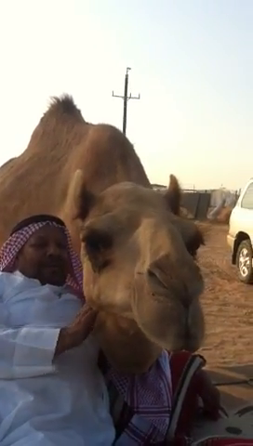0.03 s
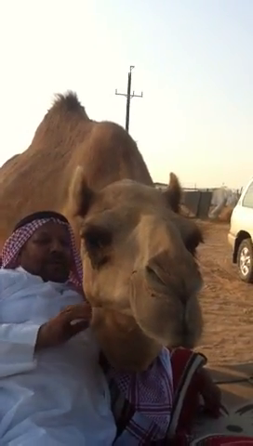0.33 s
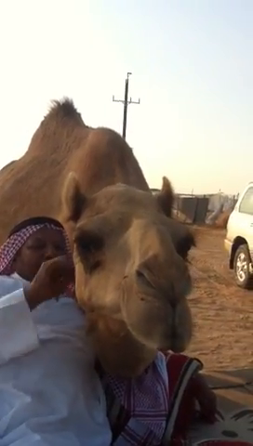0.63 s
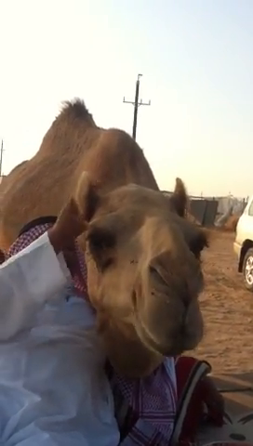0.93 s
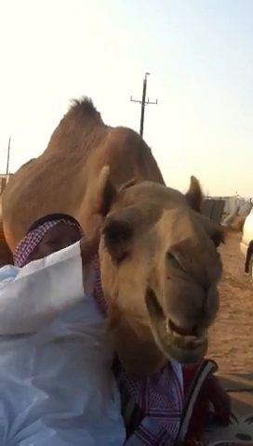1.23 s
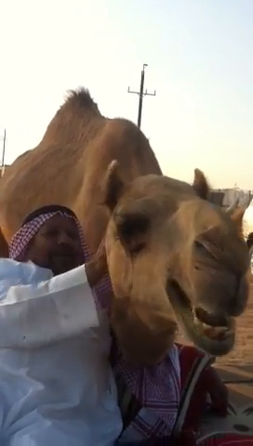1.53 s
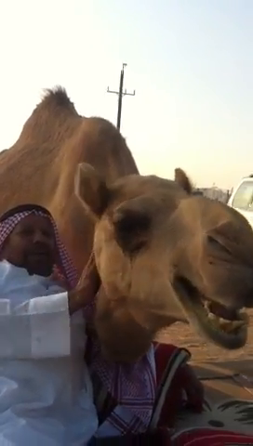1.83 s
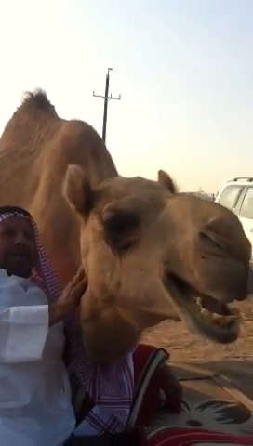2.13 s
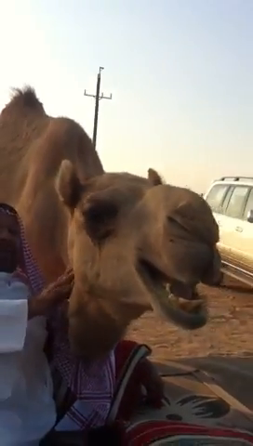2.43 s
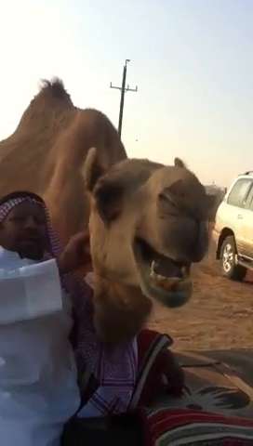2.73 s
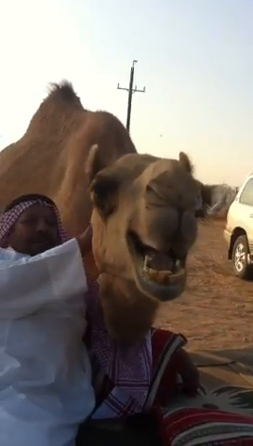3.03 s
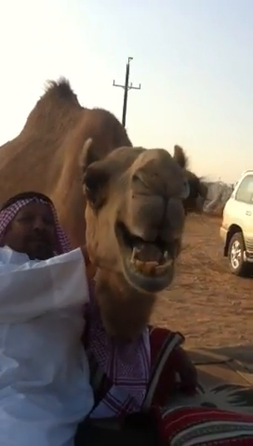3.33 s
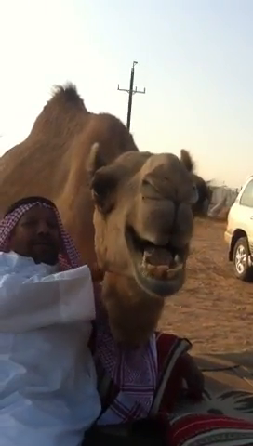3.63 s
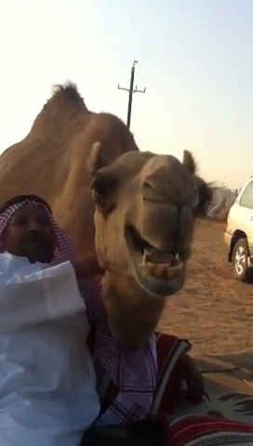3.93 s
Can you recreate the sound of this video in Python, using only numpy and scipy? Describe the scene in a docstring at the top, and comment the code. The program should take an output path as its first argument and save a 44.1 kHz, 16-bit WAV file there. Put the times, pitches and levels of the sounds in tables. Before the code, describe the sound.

A camel's low nasal moan turns into a loud, wet, rasping roar close by.

```python
"""Still desert air, a camel close to a small microphone. It moans softly through the nose, lips closed,
parts them briefly, then snorts with a catch in the throat. Its mouth opens in a long gargling roar:
slow throat pulses, accented in twos and later in threes, ring in chest, throat and mouth, with wet
slaps of loose tissue and a hiss of air. A few dull thumps sound under both moan and roar."""
import sys
import numpy as np
from scipy import signal
from scipy.fft import rfft, irfft
from scipy.io import wavfile
from scipy.ndimage import uniform_filter1d

SR = 44100
rng = np.random.default_rng(int(sys.argv[2]) if len(sys.argv) > 2 else 0)


def wrap_up_sound(samples):
    """Save the sound to the file named by the first command line argument, as 16-bit audio."""
    columns = np.atleast_2d(samples).T
    # keep every value between -1 and 1, then stretch to whole-number steps
    tamed = np.clip(columns, -1, 1)
    steps = np.round(tamed * 32767).astype(np.int16)
    wavfile.write(sys.argv[1], SR, steps)


N = 176400

# resonances of the throat: centre_hz, width_hz, gain_db
THROAT_RESONANCES = [(355, 59, -1.5), (450.6, 117, -3), (593.8, 78.4, 4), (688, 151, -16)]
# the main mouth resonance, which sinks as the jaw opens: time_s, centre_hz, level_db
JAW_RESONANCE = [(1.11, 1620, -87), (1.13, 1670, -65), (1.17, 1810, -44.5), (1.33, 1775, -61),
                 (1.47, 1800, -35.5), (1.65, 1760, -48.5), (2.2, 1706, -42.5), (2.548, 1670, -44),
                 (2.78, 1646, -39.5), (3.3, 1622, -39), (4.0, 1627, -44)]
OPEN_JAW_HZ, JAW_WIDTH_HZ = 1686, 138


def from_db(db):
    """Decibels to gain."""
    return 10 ** (np.asarray(db) / 20)


def rms_one(x):
    """Scale to rms 1."""
    return x / np.sqrt(np.mean(x ** 2) + 1e-20)


def in_time(rows):
    """Each column of a curve, at every sample."""
    time_s, *columns = np.transpose(rows)
    return [np.interp(np.arange(N) / SR, time_s, column) for column in columns]


def clicks(start_s, sizes):
    """Single-sample clicks at the given times."""
    return np.bincount(np.clip(np.asarray(start_s) * SR, 0, N).astype(int), sizes, N + 1)[:N]


def evened(x):
    """Hold the level at rms 1 over a tenth of a second."""
    return x / np.sqrt(np.abs(uniform_filter1d(x ** 2, SR // 10)) + 1e-14)


def resonance(x, hz, width_hz, order=2):
    """A resonance whose centre may move; steep at order 2."""
    turn = np.exp(2j * np.pi * np.cumsum(hz * np.ones(N)) / SR)
    lowpass = signal.butter(order, width_hz / 2, fs=SR)
    return 2 * np.real(signal.lfilter(*lowpass, x / turn + 1e-18) * turn)


def cavity(x, resonances):
    """Parallel resonances with alternating signs."""
    return sum((-1) ** k * from_db(db) * resonance(x, hz, width_hz)
               for k, (hz, width_hz, db) in enumerate(resonances))


def coloured_noise(spectrum):
    """Noise with the given spectrum, rms 1."""
    hz, db = np.transpose(spectrum)
    bin_hz = np.arange(N // 2 + 1) * SR / N
    gain = from_db(np.interp(np.log(bin_hz + 1), np.log(hz), db))
    return rms_one(irfft(rfft(rng.standard_normal(N)) * gain, N))


def drift(hz):
    """A random wander, mostly slower than hz, rms 1."""
    return coloured_noise([(hz, 0), (2 * hz, -20), (20 * hz, -120)])


def cycle_starts(rate_hz):
    """Times in seconds at which each cycle begins."""
    return np.flatnonzero(np.diff(np.floor(np.cumsum(rate_hz) / SR))) / SR


def still_air(level_db=-60.5):
    """The desert background: faint, steady noise, mostly bass."""
    # spectrum of the air: frequency_hz, density_db
    spectrum = [(25, -30), (60, -3.5), (120, 3), (220, -11), (400, -19.5), (1200, -19.5), (2500, -28.5),
                (15000, -36)]
    return from_db(level_db) * coloured_noise(spectrum)


def thumps(half_width_cycles=.8):
    """Each dull thump swells and dies within about two cycles."""
    # thumps under the voice: centre_s, level_db, pitch_hz
    beats = [(0.193, -55, 140), (0.33, -41, 161), (0.63, -41.5, 150), (1.257, -21.5, 197.1),
             (1.457, -13.5, 360), (1.466, -11.5, 370), (1.468, -18.5, 840), (1.481, -11.5, 207),
             (1.51, -10, 234), (1.562, -13.5, 203), (2.147, -11.5, 199), (3.599, -18, 164.8),
             (3.795, -19.5, 161)]
    out, t = np.zeros(N), np.arange(N) / SR
    for centre_s, level_db, pitch_hz in beats:
        cycles = np.clip((t - centre_s) * pitch_hz, -10, 10)
        swell = np.exp(-(cycles / half_width_cycles) ** 2)
        out -= from_db(level_db) * swell * np.sin(2 * np.pi * cycles)
    return out


def moan():
    """Pulses through the nose, rougher and brighter as the lips part; then the lips close again."""
    # pitch of the voice: time_s, pitch_hz
    melody = [(.24, 119.3), (.28, 114.3), (.66, 107.7), (.82, 104), (.85, 104.7), (.885, 119.2)]
    # effort, and the gain of the lip resonances as the lips part: time_s, level_db, lips_db
    effort = [(.22, -84, -12), (.265, -55, -15), (.45, -54, -8), (.58, -52.5, -7.5), (.72, -47, 0.5),
              (.82, -41, 0), (.86, -43.5, -2), (.89, -73, -10), (.93, -66, -12)]
    # resonances of the nose and of the lips: centre_hz, width_hz, gain_db
    nose_resonances = [(112, 25, 1.5), (218, 27, 6.5), (375, 150, -2.5), (684.5, 79, 9), (1890, 100, -14.5)]
    lip_resonances = [(831, 45, 11.5), (1010, 200, 1)]
    # the top resonance sinks as the lips close: time_s, centre_hz
    lips_closing = [(.72, 1480), (.8, 1390), (.87, 1070)]
    (pitch_hz,), (level_db, lips_db), (closing_hz,) = map(in_time, (melody, effort, lips_closing))
    start_s = cycle_starts(pitch_hz)
    pulses = clicks(start_s, 1 + 0.046 * rng.standard_normal(len(start_s)))
    breath = (0.0043 + 0.0051 * from_db(lips_db)) * rng.standard_normal(N)
    voice = pulses + breath
    lips = cavity(voice, lip_resonances) + from_db(-11.5) * resonance(voice, closing_hz, width_hz=310)
    return from_db(level_db) * evened(cavity(voice, nose_resonances) + from_db(lips_db) * lips)


def catches():
    """The snort catches in the throat: single soft pulses ring it before the roar sets in."""
    # soft pulses: start_s, peak_db
    soft_pulses = [(.89, -45), (1.035, -34), (1.075, -36.5), (1.124, -30)]
    start_s, peak_db = np.transpose(soft_pulses)
    unit_peak = np.abs(cavity(clicks([0], [1]), THROAT_RESONANCES)).max()
    return cavity(clicks(start_s, from_db(peak_db)), THROAT_RESONANCES) / unit_peak


def slaps(boost_db=6, lead_s=0.001487):
    """Loose tissue claps shut and rings the mouth, higher up once it is wide open."""
    # wet slaps in the throat: time_s, relative_db
    closures = [(1.165, -24.5), (1.175, -24), (1.211, -24.5), (1.221, -27), (1.332, -23), (1.342, -25.5),
                (1.378, -26.5), (1.447, -23), (1.537, -26), (1.587, -26), (1.618, -24.5), (1.649, -26),
                (1.723, -25.5), (2.255, -23), (2.286, -26), (2.412, -24), (2.57, -24.5), (2.747, -23.5),
                (2.81, -21), (2.92, -23), (3.031, -28), (3.225, -27.5), (3.256, -24.5), (3.286, -23.5),
                (3.318, -25.5), (3.399, -24.5), (3.592, -28.5), (3.905, -30.5), (3.97, -30)]
    # the mouth's ring, and the ring that joins as it widens: centre_hz, width_hz, gain_db
    ring = [(605, 135, 24), (1080, 170, 17.5), (1247, 76, 17), (3800, 1700, -19)]
    open_ring = [(1457, 130, 18)]
    time_s, relative_db = np.transpose(closures)
    wide, = in_time([(1.7, 0.035), (2.2, 0.76)])
    unit_peak = np.abs(cavity(clicks([0], [1]), ring)).max()
    claps = clicks(time_s - lead_s, from_db(relative_db + boost_db)) / unit_peak
    return cavity(claps, ring) - wide * cavity(claps, open_ring)


def squawks():
    """Single hard pulses ring the main mouth resonance and, faintly, one above it."""
    # hard pulses: start_s, peak_db
    hard_pulses = [(1.122, -40), (1.152, -42), (1.197, -30.5), (1.242, -25), (1.289, -24.5), (1.319, -27.5),
                   (1.332, -24.5), (1.363, -25), (1.379, -26), (1.411, -23), (1.441, -26), (2.665, -25),
                   (2.698, -30), (2.731, -26.5), (2.779, -20)]
    # the faint upper resonance: centre_hz, width_hz, gain_db
    upper_ring = [(3860, 250, -24)]
    start_s, peak_db = np.transpose(hard_pulses)
    jaw_hz, _ = in_time(JAW_RESONANCE)
    unit_peak = np.abs(resonance(clicks([0], [1]), OPEN_JAW_HZ, JAW_WIDTH_HZ)).max()
    pulses = clicks(start_s, from_db(peak_db)) / unit_peak
    return resonance(pulses, jaw_hz, JAW_WIDTH_HZ) + cavity(pulses, upper_ring)


def hiss(pulses, puffs, spittle_per_s=200, upper_q=26):
    """Throbbing air: a broad hiss, and a rasp with crackling spittle that rings in the opening mouth."""
    # air through the mouth: time_s, broad_db, upper_db
    airflow = [(.94, -87, -98), (.99, -61.5, -80), (1.04, -62.5, -75), (1.115, -91, -76), (1.125, -61, -60),
               (1.16, -62, -65), (1.26, -52, -55.5), (1.5, -49, -57.5), (2.2, -47.5, -55.5),
               (2.5, -50, -52.5), (2.75, -46, -53), (3.35, -48, -49), (4.0, -49.5, -53.5)]
    # spectrum of the broad hiss: frequency_hz, density_db
    spectrum = [(2000, 7.5), (3000, -1.5), (4600, 1.5), (6200, 0), (8700, 2.5), (11000, -3), (13500, -6.5),
                (15500, -14)]
    # the mouth opens: time_s, openness (0 ajar, 1 wide)
    opening = [(1.5, 0.05), (2.9, 1)]
    # upper resonances of the rasp: ajar_hz, wide_hz, ajar_db, wide_db
    upper_resonances = [(3420, 3520, 4.5, 8), (3820, 3810, 11, 4.5), (4320, 4320, 1, 6.5),
                        (5000, 5090, 0, 2.5), (6340, 6050, 3.5, -2.5), (8300, 7780, 0, 0)]
    (broad_db, upper_db), (openness,) = in_time(airflow), in_time(opening)
    flutter_db = 1.1 * drift(hz=45)
    throb = rms_one(1 + .35 * puffs) * from_db(flutter_db)
    pops = rng.random(N) < spittle_per_s * throb / SR
    spittle = rms_one(pops * rng.standard_normal(N))
    rasp = throb * rng.standard_normal(N) + 0.71 * (pulses + spittle)
    ringing = np.zeros(N)
    for ajar_hz, wide_hz, ajar_db, wide_db in upper_resonances:
        centre_hz = ajar_hz + openness * (wide_hz - ajar_hz)
        gain_db = ajar_db + openness * (wide_db - ajar_db)
        ringing += from_db(gain_db) * resonance(rasp, centre_hz, ajar_hz / upper_q)
    return from_db(broad_db) * throb * coloured_noise(spectrum) + from_db(upper_db) * evened(ringing)


def throat_pulses(rate_hz, roughness, threes_from_s=3.52, jitter_s=.0008, spread_db=1.8, puff_s=0.0049):
    """Pulses accented in twos, later threes; the same pushing and pulling in turn; a puff after each."""
    start_s = cycle_starts(rate_hz)
    k = np.arange(len(start_s))
    chance = np.clip(rng.standard_normal((len(start_s), 2)), -2, 2)
    size_scatter, time_scatter = chance.T * roughness[(start_s * SR).astype(int)]
    accent_db = np.where(start_s < threes_from_s, -2 * (k % 2), -7.5 * (k % 3 > 0))
    sizes = from_db(accent_db + spread_db * size_scatter)
    start_s = start_s + jitter_s * time_scatter
    pulses = clicks(start_s, sizes)
    swings = clicks(start_s, sizes * (-1) ** k)
    puffs = signal.lfilter([1], [1, -np.exp(-1 / (puff_s * SR))], pulses + 1e-18)
    return rms_one(pulses), rms_one(swings), rms_one(puffs)


def side_cavities(sound, jaw_hz):
    """Side cavities swallow narrow bands, which move with the main mouth resonance."""
    # the bands with the jaw open: centre_hz, width_hz
    notches = [(1385, 310), (2265, 34), (2760, 150), (5380, 190), (6750, 250)]
    stretch = (jaw_hz / OPEN_JAW_HZ) ** 0.96
    for centre_hz, width_hz in notches:
        sound = sound - resonance(sound, centre_hz * stretch, width_hz, order=1)
    return sound


def roar(tone_per_pulse_rate=3.5):
    """Pulses and puffing turbulence ring in chest, throat and mouth, over a clean tone, under a hiss."""
    # pace of the throat pulses: time_s, rate_hz
    pace = [(1.45, 65.57), (1.83, 62.6), (2.1, 62.1), (2.33, 65.52), (2.5, 61.4), (2.85, 63.88),
            (3.15, 60.97), (3.33, 63.51), (3.6, 61.33)]
    # unevenness of the voice: time_s, roughness (0 to 1)
    unevenness = [(1.42, .8), (1.55, .22), (2.18, .22), (2.28, .8), (4.0, 1)]
    # levels of the deep ring and the clean tone: time_s, chest_db, tone_db
    depth = [(.8, -65, -90), (.9, -53.5, -86), (1.099, -44.5, -72), (1.17, -36.5, -31.5),
             (1.26, -32.5, -27.5), (1.42, -30, -33.5), (1.56, -35, -26.5), (2.15, -32, -24),
             (2.3, -29.5, -28.5), (3.1, -30.5, -29.5), (3.3, -30.5, -26.5), (4.0, -32, -29.5)]
    # levels of the throat and the mouth: time_s, throat_db, mouth_db
    effort = [(.88, -55, -78), (.95, -63, -72), (1.0, -54, -64), (1.115, -50.5, -63), (1.13, -34.5, -54),
              (1.25, -32.5, -37.5), (1.42, -27, -40), (1.85, -29.5, -40.5), (2.18, -30, -43),
              (2.28, -28.5, -42.5), (2.78, -29.5, -39.5), (3.4, -28, -38), (4.0, -30, -33.5)]
    # a bright resonance joins with the mouth wide open: time_s, level_db
    gaping = [(1.102, -89), (1.25, -73), (2.4, -64), (2.8, -57.5), (3.249, -48), (4.0, -48.5)]
    # resonances of the chest and of the mouth: centre_hz, width_hz, gain_db
    chest_resonances = [(218.6, 67.5, 1.5), (143, 98, -16.5)]
    mouth_resonances = [(1082, 149, 0.5), (1301, 99, 2.5), (1640, 370, -6), (2004, 192, -6)]
    (rate_hz,), (roughness,), (gape_db,) = map(in_time, (pace, unevenness, gaping))
    (chest_db, tone_db), (throat_db, mouth_db) = in_time(depth), in_time(effort)
    jaw_hz, jaw_db = in_time(JAW_RESONANCE)

    pulses, swings, puffs = throat_pulses(rate_hz, roughness)
    air = (puffs + 1) * rng.standard_normal(N)   # some turbulence flows on between puffs
    low_air = 0.91 * roughness * air
    mouth_drive = pulses + 0.88 * air

    chest = from_db(chest_db) * evened(cavity(pulses + low_air, chest_resonances))
    throat = from_db(throat_db) * evened(cavity(swings + low_air, THROAT_RESONANCES))
    mouth = from_db(mouth_db) * evened(cavity(mouth_drive, mouth_resonances))
    jaw = from_db(jaw_db) * evened(resonance(pulses + 0.35 * air, jaw_hz, JAW_WIDTH_HZ))
    gape = from_db(gape_db) * evened(resonance(mouth_drive, hz=2500, width_hz=124))
    pulse_phase = 2 * np.pi * np.cumsum(rate_hz) / SR
    tone = from_db(tone_db) * rms_one(np.sin(tone_per_pulse_rate * pulse_phase))
    bright = side_cavities(mouth + jaw + gape + hiss(pulses, puffs), jaw_hz)
    onset, = in_time([(.84, 0.0064), (.9, 0.94)])
    return onset * (chest + throat + tone + bright)


def scene():
    """The camel at close range with two faint reflections, over the thumps and the still air."""
    # reflections off nearby surfaces: delay_s, gain_db
    surfaces = [(.0068, -19), (0.0125, -16)]
    camel = moan() + catches() + roar() + slaps() + squawks()
    echoes = sum(from_db(gain_db) * np.pad(camel, (int(delay_s * SR), 0))[:N]
                 for delay_s, gain_db in surfaces)
    return (camel + echoes + thumps() + still_air())[None]


def record(dry, bass_hz=90, top_hz=15800, fade_s=.003):
    """One small microphone that loses the bass; the end is eased and the top is cut."""
    thin = signal.sosfilt(signal.butter(2, bass_hz, "high", fs=SR, output="sos"), dry)
    eased = thin * np.minimum(1, np.arange(N)[::-1] / (fade_s * SR))
    return signal.sosfilt(signal.ellip(12, .1, 80, top_hz, fs=SR, output="sos"), eased)


dry = scene()
out = record(dry)
wrap_up_sound(out)
```